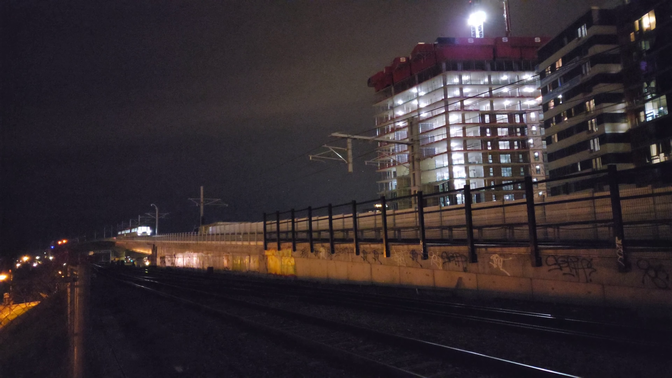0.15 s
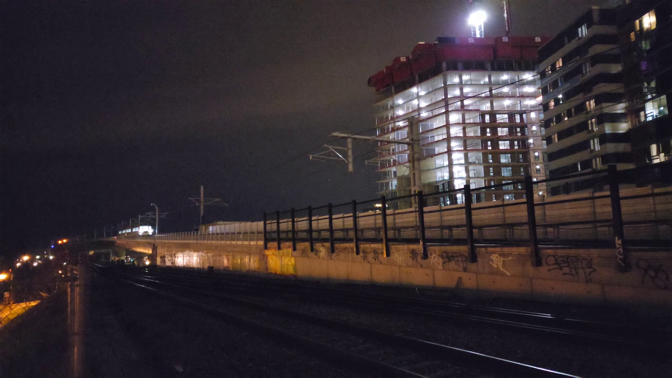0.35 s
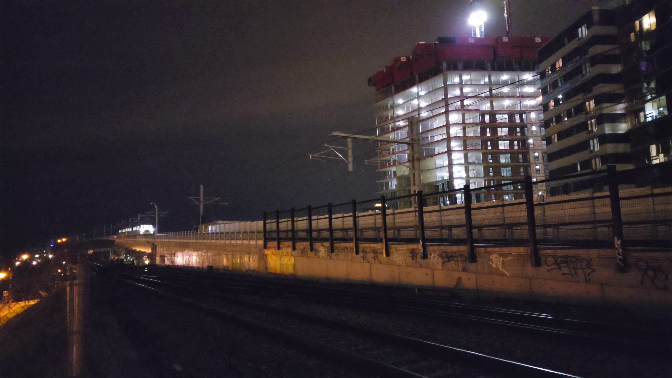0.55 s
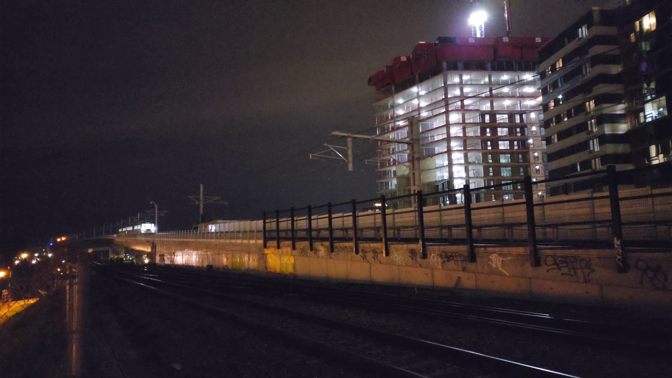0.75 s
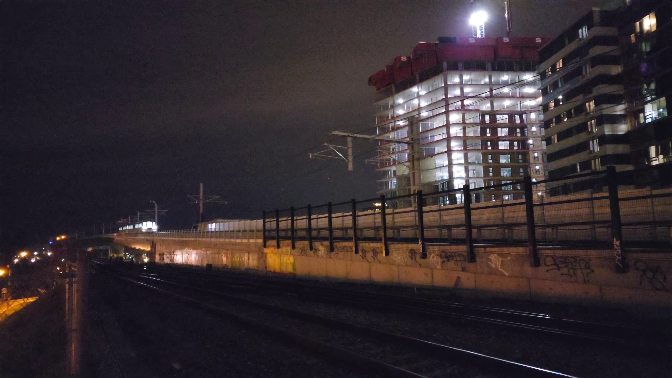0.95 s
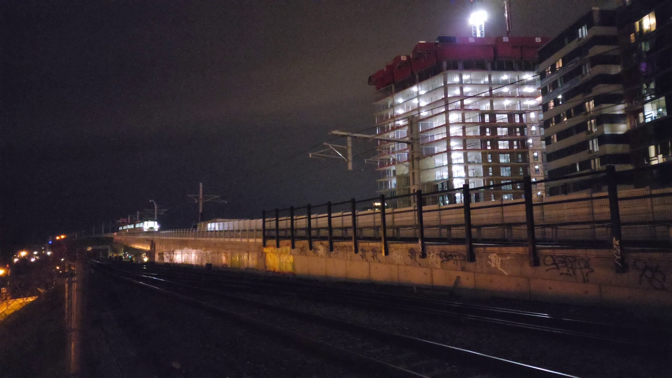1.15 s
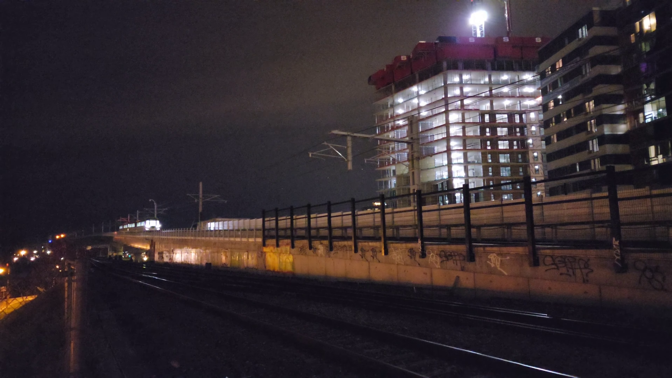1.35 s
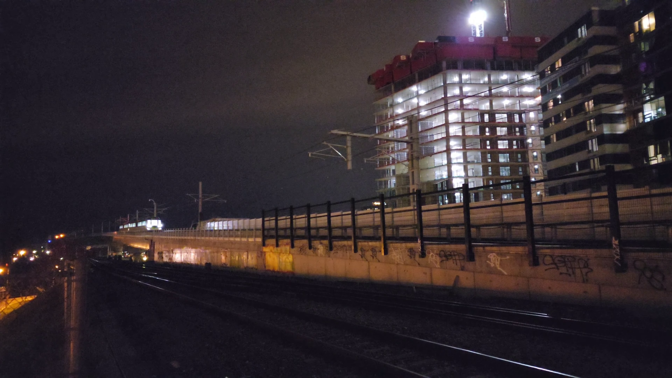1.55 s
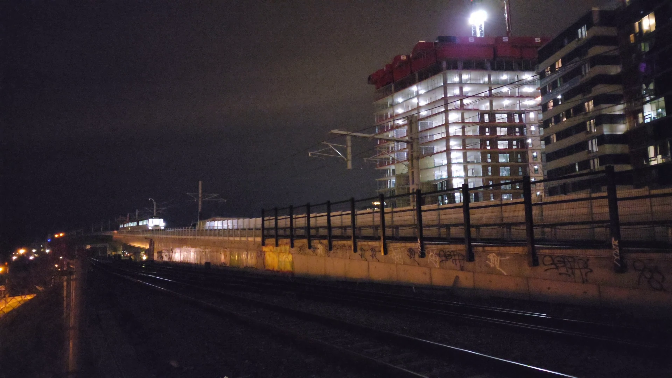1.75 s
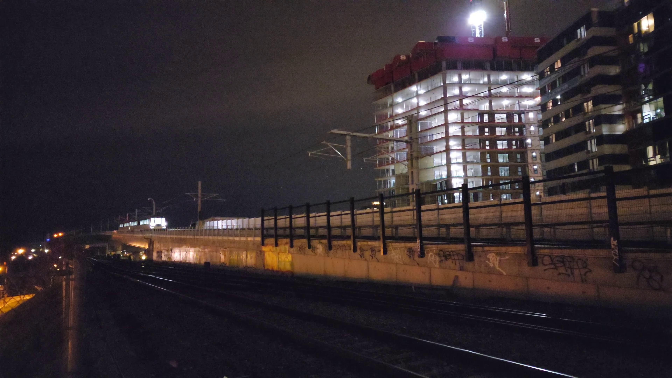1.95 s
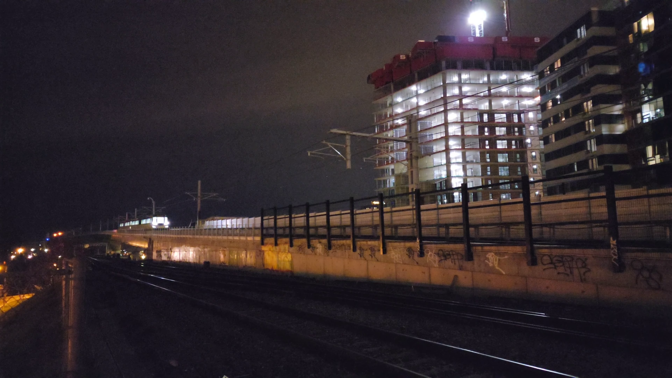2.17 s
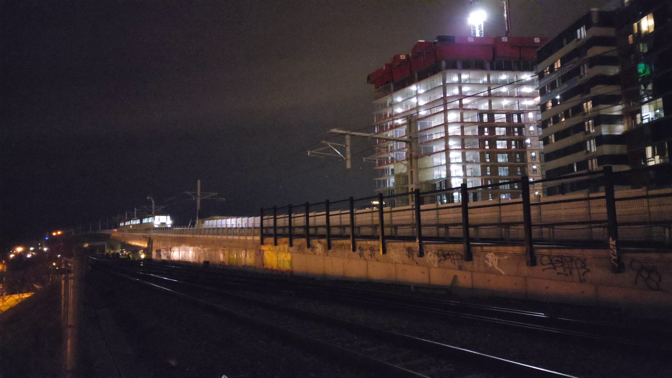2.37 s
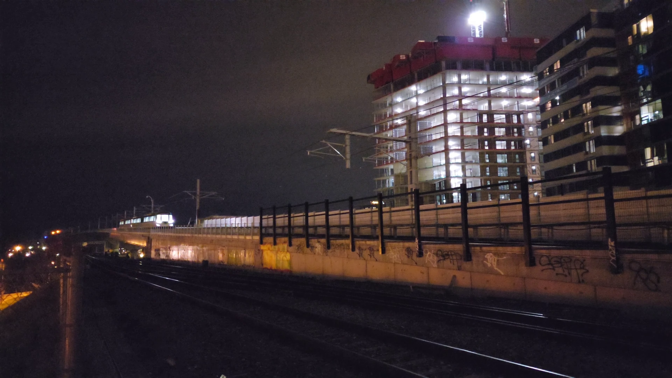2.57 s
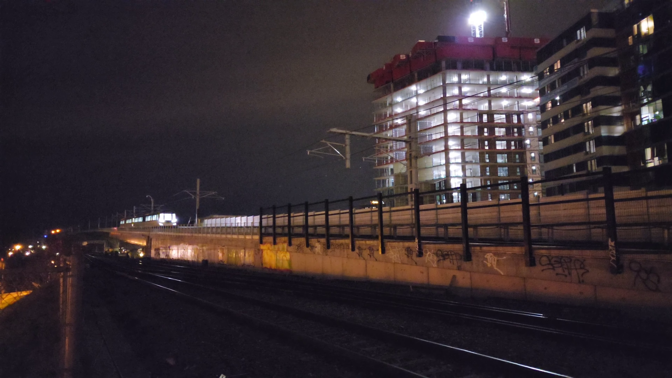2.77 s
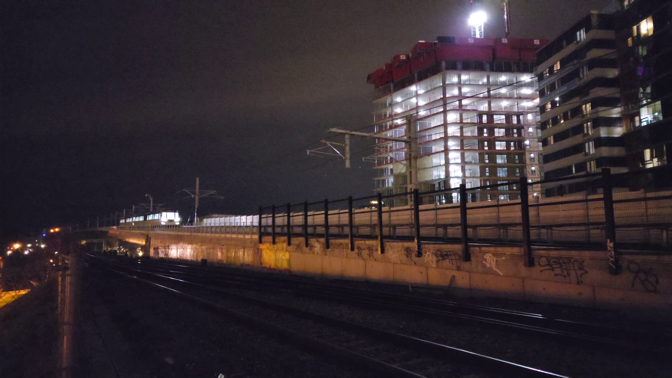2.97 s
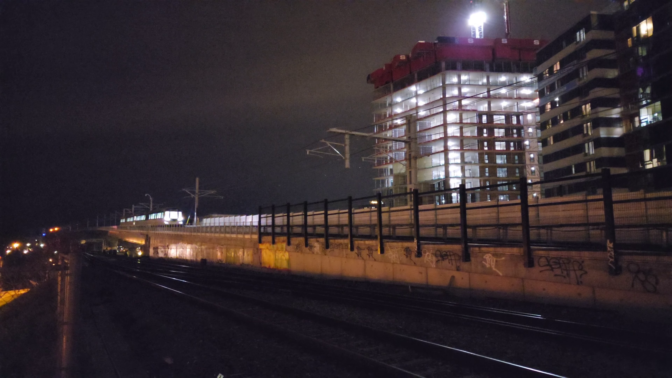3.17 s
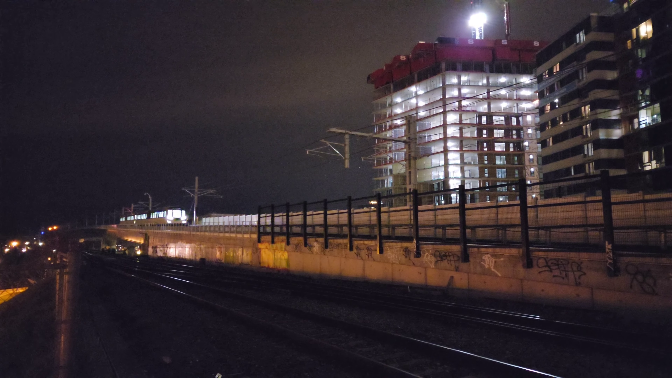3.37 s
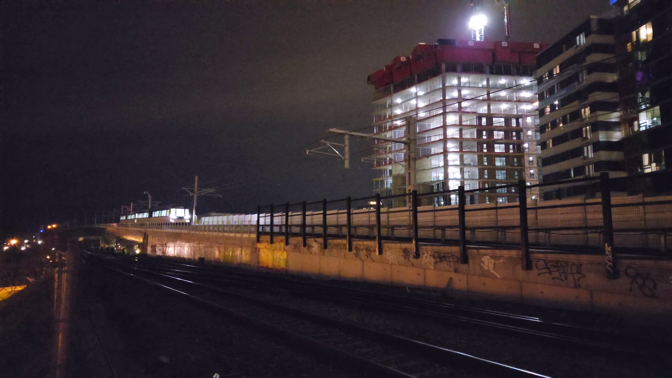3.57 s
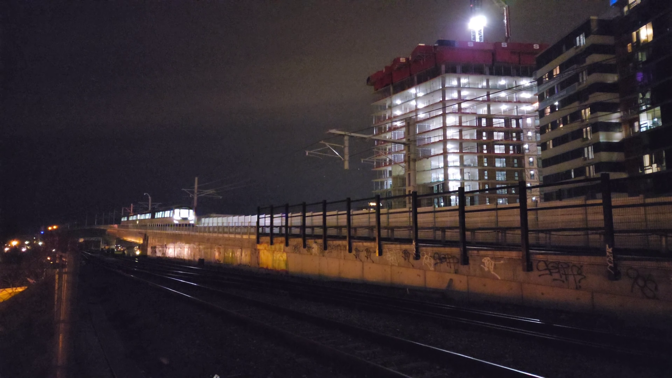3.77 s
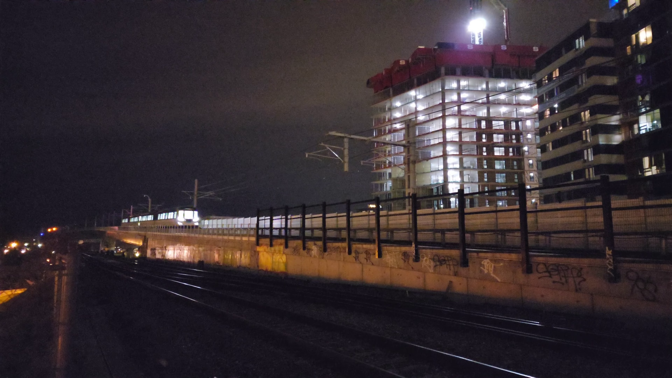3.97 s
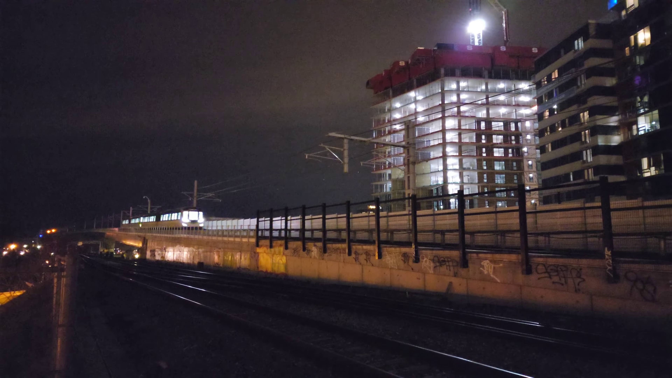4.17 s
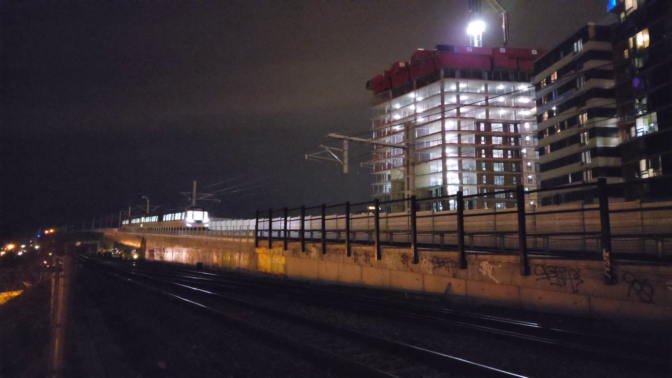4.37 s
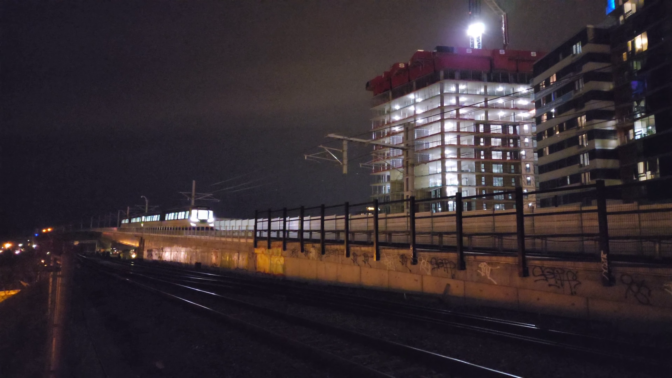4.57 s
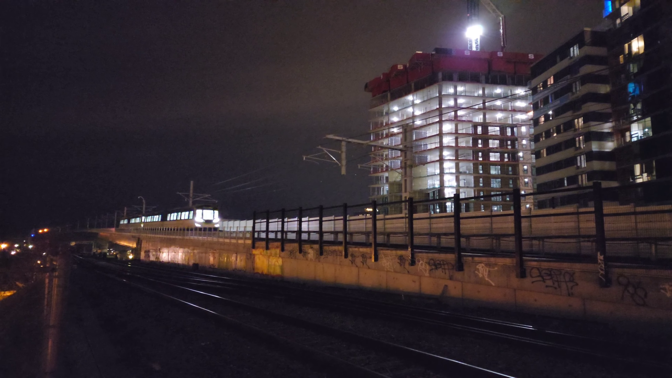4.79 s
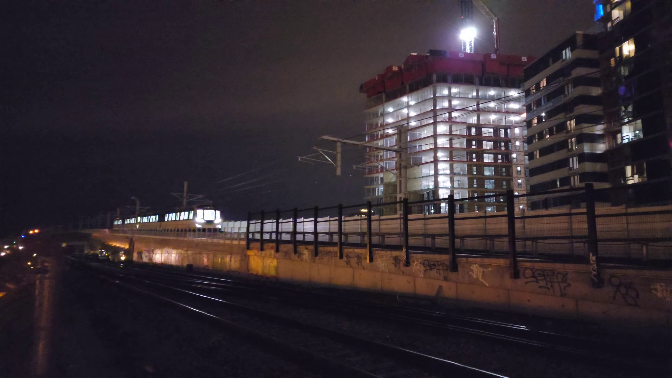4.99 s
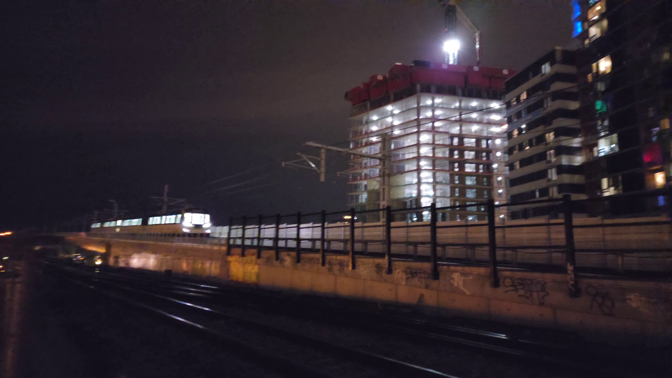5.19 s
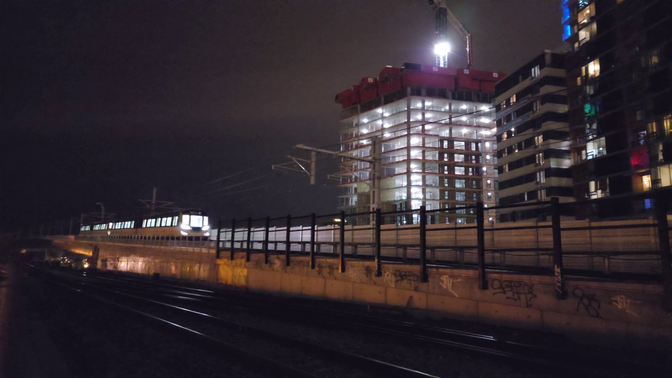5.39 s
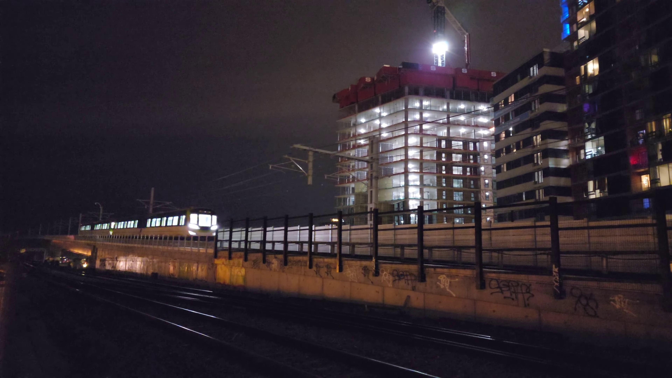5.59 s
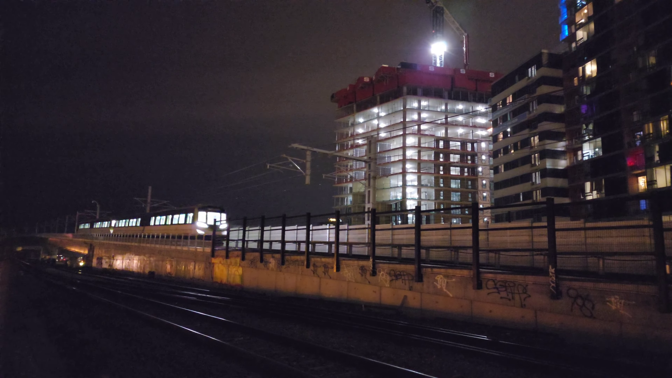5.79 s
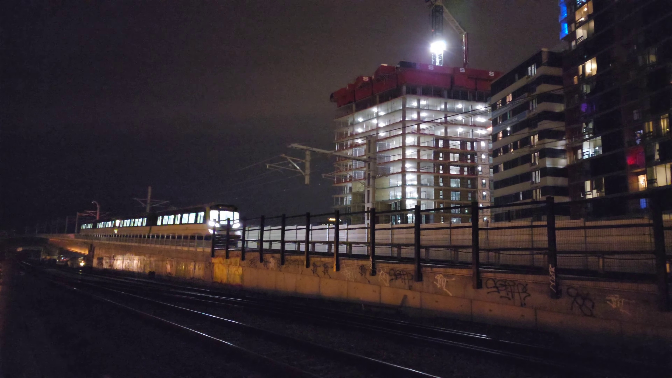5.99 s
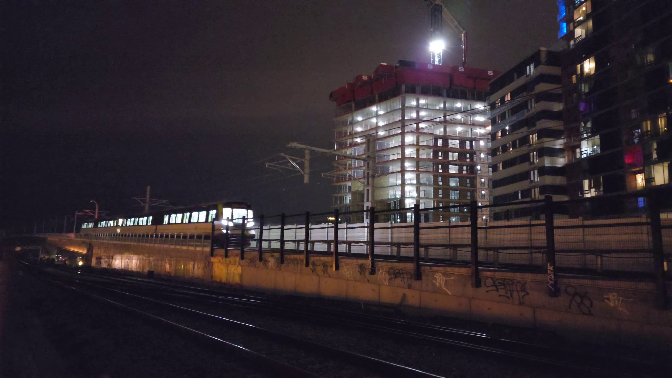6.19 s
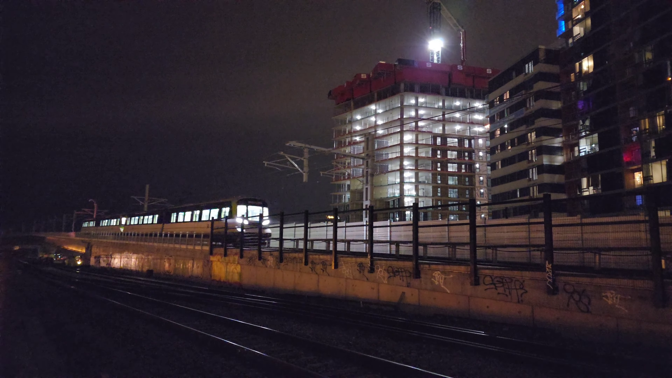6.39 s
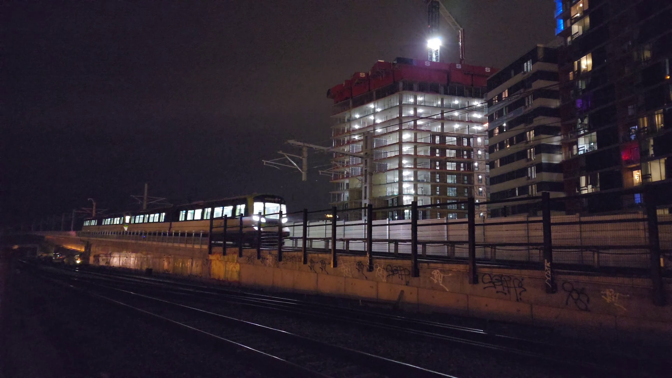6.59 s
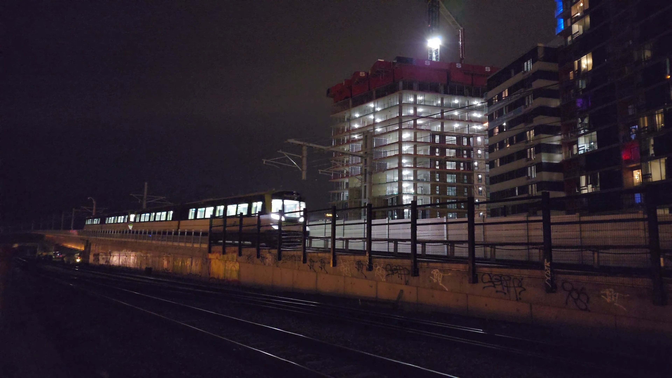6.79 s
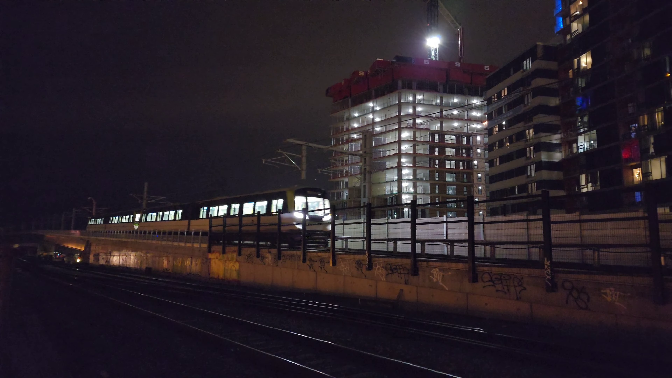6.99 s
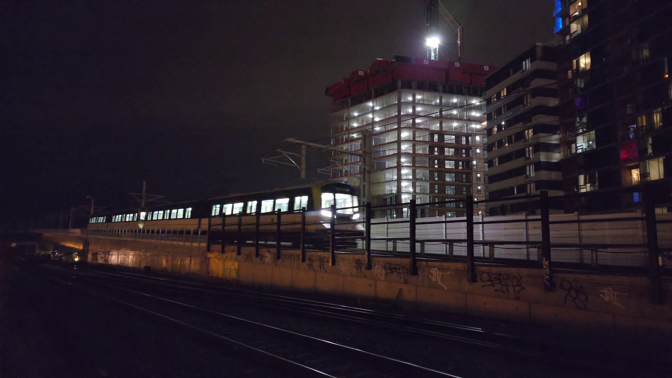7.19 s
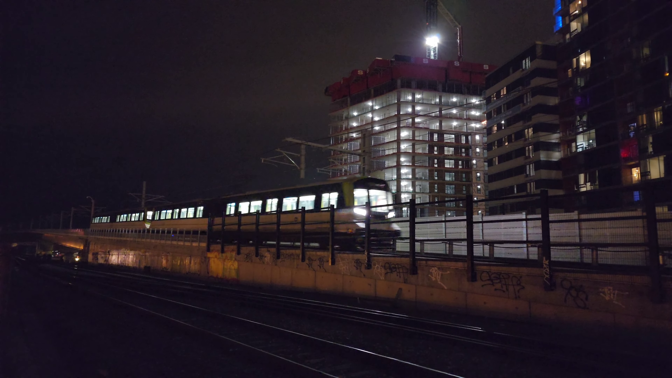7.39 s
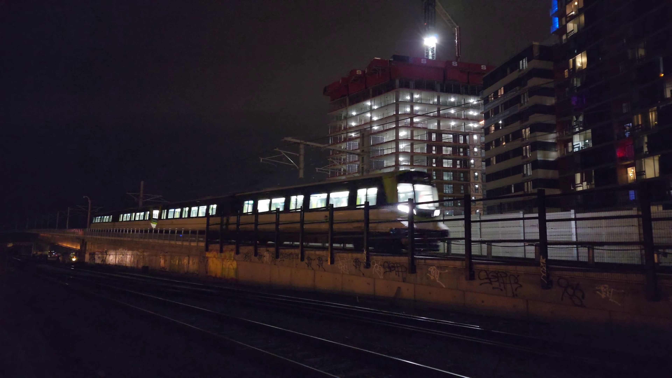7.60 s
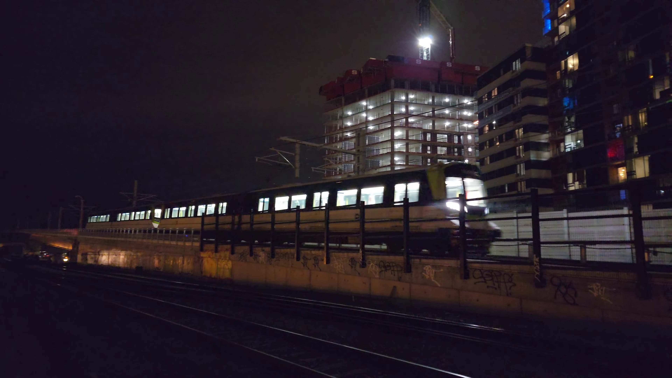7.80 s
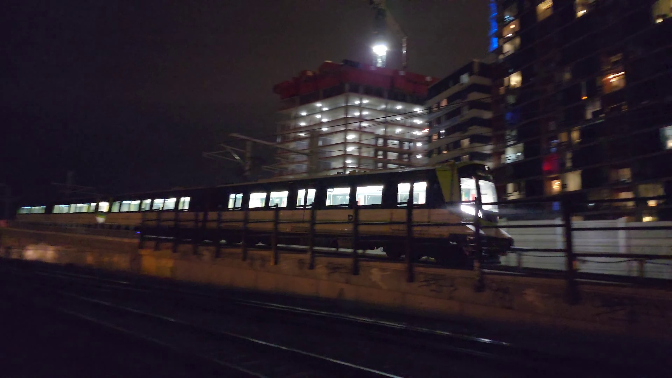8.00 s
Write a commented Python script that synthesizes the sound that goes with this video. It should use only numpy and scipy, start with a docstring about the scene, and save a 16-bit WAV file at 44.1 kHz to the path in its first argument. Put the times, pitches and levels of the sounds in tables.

```python
"""Metro train nearing on a viaduct

An electric metro train approaches on a concrete viaduct at night, over the low rumble of a city.
Rough wheels on rail drive two broad track resonances and a roar: filtered noises whose levels follow distance.
Wheels ring, rails sizzle and spans boom as sets of noise-driven modes; the traction whine is a sum of sines.
As the train nears, its hiss loses less to the air and the faint whine comes through.
"""
import sys
import numpy as np
from scipy import signal
from scipy.fft import rfft, irfft, next_fast_len
from scipy.io import wavfile
from scipy.ndimage import uniform_filter1d

SR = 44100
rng = np.random.default_rng(int(sys.argv[2]) if len(sys.argv) > 2 else 0)


def transcribe(signal):
    """Save signal, clipped to [-1, 1], as a 16-bit WAV file at the path in sys.argv[1]."""
    frames = np.atleast_2d(signal).T
    limited = np.clip(frames, -1, 1)
    pcm = np.round(limited * 32767).astype(np.int16)
    wavfile.write(sys.argv[1], SR, pcm)


N = 355005
TIME = np.arange(N) / SR  # s
SIZE = next_fast_len(N + SR // 10, True)  # transform length, with room for echoes
HZ = np.maximum(np.arange(SIZE // 2 + 1) * SR / SIZE, 1)

# the wheels come into the open round a bend: (time [s], time taken [s])
BEND = (2.48, .55)
# and then past a parapet: (time [s], time taken [s])
PARAPET = (4.54, .28)


def from_db(db):
    """Level to amplitude: 20 dB is a factor of ten."""
    return 10 ** (np.asarray(db) / 20)


def rms(x):
    """Effective value: the root of the mean power."""
    return np.sqrt(np.mean(x ** 2) + 1e-30)


def in_time(rows, blur_s=.01):
    """Linear interpolation of each column over time, its corners rounded by a moving mean."""
    s, *columns = np.transpose(rows)
    blur = max(int(blur_s * SR), 1)
    return [uniform_filter1d(np.interp(TIME, s, column), blur) for column in columns]


def in_frequency(rows):
    """Interpolation of each column on a logarithmic frequency axis."""
    hz, *columns = np.transpose(rows)
    return [np.interp(np.log(HZ), np.log(hz), column) for column in columns]


def colour(points):
    """Spectral envelope: gain through the points, falling 40 dB per octave beyond them."""
    octaves_outside = np.abs(np.log2(HZ / np.clip(HZ, points[0][0], points[-1][0])))
    return from_db(in_frequency(points)[0] - 40 * octaves_outside)


def resonances(modes, skirt=3.0):
    """Independently driven modes add in power; each skirt steepens some widths from its centre."""
    power = 0
    for hz, width_hz, db in modes:
        detune = (HZ ** 2 - hz ** 2) / (HZ * width_hz)
        peak = from_db(db) ** 2 / (1 + detune ** 2)
        power = power + peak / (1 + (detune / skirt) ** 2)
    return np.sqrt(power)


def drift(rate_hz):
    """Low-passed noise: slow chance of rms 1, changing about rate_hz times a second."""
    low_pass = 1 / (1 + (HZ / rate_hz) ** 4)
    slow = irfft(rfft(rng.standard_normal(SIZE)) * low_pass, SIZE)[:N]
    return slow / rms(slow)


def field(gain):
    """Partial coherence: coloured noise as two microphone ports hear it; their mean has rms 1."""
    # the ports: (frequency [Hz], in-phase likeness [1], quadrature likeness [1], left over right [dB])
    ports = [(90, 1, -.05, -.4), (210, .93, -.12, -.9), (330, .83, .15, -1.7), (437, .8, .12, 0),
             (590, .64, .25, -1.1), (730, -.26, .36, 1.1), (850, .55, .15, 0), (1080, -.42, .12, 1.5),
             (1220, -.25, -.12, 1), (1420, -.5, -.38, 0), (1700, -.15, -.42, -2.5), (1950, .76, .03, -1),
             (2300, .48, -.15, 0), (2800, -.28, -.2, 3.5), (4400, .049, .087, -3.5), (6800, 0, -.02, 1),
             (9500, .03, -.01, 1), (13000, .03, 0, 6.9)]
    in_phase, quadrature, balance_db = in_frequency(ports)
    alike = in_phase + 1j * quadrature
    alike = alike / np.maximum(1, np.abs(alike) / .998)  # coherence stays below 1
    shared, own = rfft(rng.standard_normal((2, SIZE)))
    lean = from_db(balance_db / 2)
    left = shared * lean
    right = (shared * np.conj(alike) + own * np.sqrt(1 - np.abs(alike) ** 2)) / lean
    # the colour holds for the sum of the ports
    centre = np.sqrt(lean ** 2 + lean ** -2 + 2 * alike.real)
    pair = irfft(np.array([left, right]) * gain / centre, SIZE)[:, :N]
    return pair / rms(pair.mean(axis=0))


def steady(pair, span_s):
    """Gain control by running power: evens slow swells of a narrow noise, keeps its fast beating."""
    power = uniform_filter1d(pair.mean(axis=0) ** 2, max(int(span_s * SR), 2))
    return pair / np.sqrt(power + 1e-9)


def hidden(step):
    """Smooth step: 1 while the wheels are screened, easing to 0 as they come into the open."""
    s, length_s = step
    return .5 - .5 * np.tanh(2 * (TIME - s) / length_s)


def swell(s, length_s):
    """Gaussian envelope: a smooth rise and fall of height 1, length_s wide at 1/e."""
    return np.exp(-(2 * (TIME - s) / length_s) ** 2)


def arriving(near_db, doubling_db=0, db_per_m=0, bend_db=0, parapet_db=0):
    """Spreading, absorption and screening: dB lost per doubling, per metre and behind each screen."""
    # uniform motion on a straight line, start_m short of the point abreast of the listener
    start_m, speed_m_per_s, aside_m = 189.9, 20.01, 15.1
    metres = np.hypot(start_m - speed_m_per_s * TIME, aside_m)
    nearest_m = metres.min()
    spreading_db = doubling_db * np.log2(metres / nearest_m)
    absorbed_db = db_per_m * (metres - nearest_m)
    screened_db = bend_db * hidden(BEND) + parapet_db * hidden(PARAPET)
    return near_db - spreading_db - absorbed_db - screened_db


def surges():
    """Amplitude modulation: level changes [dB] of lower resonance, upper resonance and roar."""
    # brief swells of the rolling noise: (time [s], length [s], lower resonance [dB],
    # upper resonance [dB], roar [dB])
    rolling_swells = [(.37, .13, 2, 0, 0), (.63, .12, 2.5, -1, 0), (.92, .15, 3, 1, 0),
                      (1.26, .14, 2.5, 0, -.5), (1.56, .14, 1.5, 3.5, 1), (2.16, .13, 4, 2, 0),
                      (2.55, .33, 1, 1, 4), (2.69, .12, 0, 3, 1), (2.81, .16, 5.5, 1.5, 1),
                      (3.0, .16, 3.5, 2, .5), (3.39, .1, 0, 2, 1.8), (3.53, .18, 4, 1.5, .5),
                      (3.76, .16, 4, 5, .5), (4.15, .14, .5, 2.5, 0), (4.45, .6, 4.8, -1, -.5),
                      (4.69, .13, 1.5, 5, 1), (4.94, .2, 3.5, 3.2, 1.5), (5.14, .14, 4, 1.5, 0),
                      (5.29, .14, 2, 3.5, 1), (5.55, .28, 2.2, 3, 1.3), (6.13, .25, 1.5, 2.5, .5),
                      (6.43, .14, 2.5, 1.5, 1.8), (6.61, .13, 5, 1.5, 1.5), (6.87, .25, 0, 3, 1.5),
                      (7.42, .2, .5, .7, 1.2), (7.68, .28, 6.5, 1.8, .5), (7.93, .1, 3, -3, 1),
                      (8.03, .1, 1, 4, 0)]
    return sum(np.outer(db, swell(s, length_s)) for s, length_s, *db in rolling_swells)


def bumps():
    """Amplitude modulation: a constant judder, and a quick, rounded lift [dB] at each listed time."""
    # brief lifts of the rolling noise: (time [s], lift [dB])
    brief_lifts = [(1.747, 3.5), (2.377, 2.5), (3.15, 3), (4.14, 3), (4.67, 2.5), (4.998, 2.5),
                   (5.276, 2.5), (5.683, 3.5), (6.451, 2.5), (6.882, 3.5), (7.084, 2.5)]
    rise_s, hold_s, fall_s = .004, .016, .02
    level_db = .45 * drift(35)
    for s, db in brief_lifts:
        rise = 1 - hidden((s, rise_s))
        fall = hidden((s + hold_s, fall_s))
        level_db = level_db + db * rise * fall
    return level_db


def flares():
    """Amplitude modulation: level changes [dB] of the wheels' wash, the hiss and the rail hiss."""
    # moments when wheels and rails grow louder or softer: (time [s], length [s], wheel wash [dB],
    # hiss [dB], rail hiss [dB])
    moments = [(2.68, .5, 2, 2.5, .5), (3.6, .45, 2, .7, 1), (4.4, .35, -1.5, 2.2, -.8),
               (4.74, .2, .7, 1.1, .7), (5.25, 1.1, -1.6, -1.9, -.3), (6.02, .14, 2.3, 1, .5),
               (6.5, .5, .5, .8, .5), (7.25, .25, 2.2, .3, .5), (8.02, .3, 1.5, .5, 1.5)]
    return sum(np.outer(db, swell(s, length_s)) for s, length_s, *db in moments)


def wandering(pair, share, rate_hz):
    """Time warping: a wavering reading speed makes pitch stray by an rms share of itself."""
    place = np.arange(N) + np.cumsum(share * drift(rate_hz))
    longer = np.pad(pair, ((0, 0), (0, SR // 10)), mode="reflect")
    samples = np.arange(longer.shape[1])
    return np.array([np.interp(np.abs(place), samples, port) for port in longer])


def track():
    """Forced resonance: wheel and rail shake the rails on their fastenings at two straying pitches."""
    # lower resonance of rails on fastenings: (frequency [Hz], width [Hz], level [dB])
    lower_modes = [(431, 35, 1.2), (468, 30, 1.1)]
    # upper resonance of rails on fastenings: (frequency [Hz], width [Hz], level [dB])
    upper_modes = [(676, 42, -1), (706, 31, 3), (730, 24, -4.2), (798, 45, -13)]
    stray, strays_per_s = .014, 3.5  # stray is an rms share of the pitch
    lower_surge_db, upper_surge_db, _ = surges()
    lower_db = arriving(near_db=-27.9, doubling_db=4.0) + lower_surge_db
    upper_db = arriving(near_db=-24.3, doubling_db=6.2) + upper_surge_db
    lower = wandering(field(resonances(lower_modes, skirt=3.7)), stray, strays_per_s)
    upper = wandering(field(resonances(upper_modes, skirt=4.0)), stray, strays_per_s)
    return from_db(lower_db) * steady(lower, span_s=.18) + from_db(upper_db) * steady(upper, span_s=.18)


def roar():
    """Broadband contact noise: the contact patches roar, louder or softer in brief swells."""
    # spectrum of the contact patches: (frequency [Hz], density [dB per Hz])
    spectrum = [(250, -23), (400, 0.5), (530, 8.5), (620, 9.3), (760, 8.5), (850, 7), (900, 3),
                (1050, -0.4), (1170, -4.5), (1300, -3.5), (1480, -6.5), (1650, -11.5), (2400, -27.5)]
    *_, surge_db = surges()
    level_db = arriving(near_db=-21.5, doubling_db=7.0) + surge_db + 0.66 * drift(22)
    return from_db(level_db) * field(colour(spectrum))


def deck():
    """Structure-borne sound: the deck drones as a band of low noise."""
    # spectrum of the deck: (frequency [Hz], density [dB per Hz])
    spectrum = [(120, -25), (175, -9), (240, -1.4), (320, 2), (390, 1), (480, -3.5), (700, -24)]
    return from_db(arriving(near_db=-31.3, doubling_db=4.0)) * field(colour(spectrum))


def wheels(flare_db):
    """Modal superposition: many wheels ring at nearly the same modes, within a broader wash."""
    # ringing of the wheels: (frequency [Hz], width [Hz], level [dB])
    modes = [(1255, 70, -4), (1337, 10, 3.2), (1392, 26, -2), (1455, 44, -2), (1548, 22, -3),
             (1648, 22, -.5), (1718, 40, 1), (1825, 50, -1.5), (1895, 24, -3), (1977, 28, 2.2),
             (2172, 30, -4.5), (2235, 30, -1), (2300, 60, -6.5), (2540, 50, -16), (2903, 50, -22),
             (3108, 13, -22), (3336, 28, -19.5)]
    # spectrum of the wash around it: (frequency [Hz], density [dB per Hz])
    wash_spectrum = [(1100, -29.5), (1500, -13.5), (1750, 2.5), (1930, 4), (2100, 1), (2310, -0.3),
                     (2420, -6.5), (2700, -15.5), (3300, -36)]
    ring_db = arriving(near_db=-35.3, db_per_m=0.087, parapet_db=4.5) + .8 * drift(6)
    wash_db = arriving(near_db=-35, db_per_m=.108, parapet_db=3.1) + flare_db + .6 * drift(9)
    ring = from_db(ring_db) * field(resonances(modes, skirt=5.5))
    return ring + from_db(wash_db) * field(colour(wash_spectrum))


def hiss(flare_db):
    """Air absorption: three bands of hiss gain level as the path shortens and the screens pass."""
    # spectrum of the main hiss: (frequency [Hz], density [dB per Hz])
    main_spectrum = [(1900, -15), (2500, -.4), (2800, -1), (2950, 0), (3120, -1.8), (3420, 1.4),
                     (3640, -1.9), (3780, -1), (4020, -13.5), (4600, -29), (6000, -42)]
    # spectrum of the finer hiss above it: (frequency [Hz], density [dB per Hz])
    fine_spectrum = [(5500, -3.5), (7200, 4.5), (8000, 3), (8700, 1.5), (9400, -4.5), (10300, -8),
                     (11200, -16.5), (13000, -29.5)]
    # spectrum of the topmost rush: (frequency [Hz], density [dB per Hz])
    rush_spectrum = [(5000, -11), (8000, -3), (10300, -2), (11200, -1.5), (12500, 1.5), (15700, 0),
                     (18000, -6)]
    main_db = arriving(near_db=-43.5, doubling_db=9.5, db_per_m=0.029) + flare_db + .4 * drift(8)
    fine_db = arriving(near_db=-57.5, doubling_db=5, db_per_m=.15, bend_db=14) + .5 * drift(5)
    rush_db = arriving(near_db=-58, doubling_db=16.5, bend_db=5.5)
    main = from_db(main_db) * field(colour(main_spectrum))
    fine = from_db(fine_db) * field(colour(fine_spectrum))
    return main + fine + from_db(rush_db) * field(colour(rush_spectrum))


def rails(flare_db):
    """Rail radiation: the rails hiss, sizzle in high modes and sing for a while at single modes."""
    # spectrum of the rail hiss: (frequency [Hz], density [dB per Hz])
    hiss_spectrum = [(3500, -11.5), (3800, 1.5), (4200, .5), (4450, 0), (4760, .5), (5000, -3),
                     (5600, -5.5), (5900, -7.5), (6200, -7.5), (6800, -17.5), (8000, -24.5)]
    # sizzling of the rails: (frequency [Hz], width [Hz], level [dB])
    sizzle_modes = [(4830, 210, 2), (5250, 300, -1.5), (5650, 300, -1), (6270, 230, 4), (6710, 115, 4.6),
                    (7090, 90, -5), (8410, 120, -7)]
    # singing modes: (time [s], length [s], frequency [Hz], width [Hz], level [dB])
    singing_modes = [(2.1, 1.6, 4830, 280, -84.5), (3.5, 2.4, 6330, 300, -81), (3.9, 2.4, 6760, 170, -78.5)]
    hiss_db = arriving(near_db=-50, db_per_m=0.2, bend_db=0.5, parapet_db=6) + flare_db
    sizzle_db = arriving(near_db=-59.5, db_per_m=.175, bend_db=13.5) + .6 * drift(7)
    out = from_db(hiss_db) * field(colour(hiss_spectrum))
    out = out + from_db(sizzle_db) * field(resonances(sizzle_modes, skirt=3.0))
    for s, length_s, hz, width_hz, db in singing_modes:
        level = from_db(db + 1.5 * drift(10)) * swell(s, length_s)
        out = out + level * field(resonances([(hz, width_hz, 0)]))
    return out


def squeal():
    """Narrow-band resonance: a faint high squeal of a wheel grows as it nears."""
    # the squealing mode: (frequency [Hz], width [Hz], level [dB])
    modes = [(10375, 90, 0)]
    return from_db(arriving(near_db=-71.0, doubling_db=26)) * field(resonances(modes, skirt=3.0))


def whine():
    """Harmonic synthesis: inverter overtones; changing reflections make each swell and fade per port."""
    # overtones: (multiple of the switching tone [1], relative level [dB])
    overtones = [(8, -16), (9, -24), (10, -16), (12, -25), (16, -24.5), (17, -25)]
    tone_hz, waver, flutter_db = 467.8, .0007, 3.5  # waver is an rms share of the pitch
    turns = np.cumsum(tone_hz * (1 + waver * drift(5.6))) / SR
    out = np.zeros((2, N))
    for multiple, db in overtones:
        for port in out:
            phase = multiple * turns + rng.random() + .15 * drift(4)  # in cycles
            port += from_db(db + flutter_db * drift(5.5)) * np.sin(2 * np.pi * phase)
    return out * from_db(arriving(near_db=-44.5, db_per_m=0.3, bend_db=8, parapet_db=5))


def facades(pair, count=10):
    """Comb filtering: short echoes off parapet and buildings ripple the colour above the bass."""
    delays_s = rng.uniform(.004, .035, (2, count, 1))
    share = .2 * HZ ** 2 / (HZ ** 2 + 900 ** 2)
    echoes = np.exp(-2j * np.pi * HZ * delays_s).sum(axis=1) / np.sqrt(count)
    response = (1 + share * echoes) / np.sqrt(1 + share ** 2)
    return irfft(rfft(pair, SIZE) * response, SIZE)[:, :N]


def focus(pair):
    """Mid-side stereo: wide by reflections, narrowing as the direct sound takes over."""
    # stereo width: (time [s], gain of the side signal before the band weights [dB])
    width = [(0, -0.3), (1.5, 1), (3.8, 2), (5.2, -0.1), (6.3, -.5), (7.1, -3.5), (7.8, -7)]
    # band weights: (frequency [Hz], share that changes [dB])
    band = [(200, -20.5), (450, -9.5), (700, -0.5), (1100, -1.5), (2000, -10.5), (4000, -24)]
    width_db, = in_time(width)
    side = (pair[0] - pair[1]) / 2
    side_band = irfft(rfft(side, SIZE) * from_db(in_frequency(band)[0]), SIZE)[:N]
    return pair + side_band * (from_db(width_db) - 1) * [[1], [-1]]


def spans():
    """Bending modes: the concrete spans boom under the train, and the nearest one drones."""
    # boom of the spans: (frequency [Hz], width [Hz], level [dB])
    boom_modes = [(52, 16, 0), (66, 20, -1)]
    # brief swells of the boom: (time [s], lift [dB])
    boom_swells = [(2.02, 5), (3.34, 5.5), (4.55, 7.5)]
    # drone of the nearest span: (frequency [Hz], width [Hz], level [dB])
    drone_modes = [(61, 5, -4), (73, 5, -0.5), (84, 6, -5)]
    boom_db = arriving(near_db=-41.5, doubling_db=2.5)
    boom_db = boom_db + sum(db * swell(s, length_s=.14) for s, db in boom_swells)
    drone_db = arriving(near_db=-39.0, doubling_db=3, parapet_db=5.5)
    boom = from_db(boom_db) * steady(field(resonances(boom_modes, skirt=2.9)), span_s=.3)
    return boom + from_db(drone_db) * steady(field(resonances(drone_modes, skirt=3.0)), span_s=.3)


def tick():
    """Impulse response: one faint, dry tick near the microphone, a click through damped resonators."""
    # the click: (time [s], level before the resonators [dB])
    clicks_at = [(2.295, -62.5)]
    # its modes: (frequency [Hz], width [Hz], level [dB])
    modes = [(4100, 400, 4), (6250, 400, 0), (8000, 300, 1)]
    clicks, out = np.full(N, 1e-18), 0
    for s, db in clicks_at:
        clicks[int(s * SR)] = from_db(db)
    for hz, width_hz, db in modes:
        radius, angle = np.exp(-np.pi * width_hz / SR), 2 * np.pi * hz / SR
        poles = [1, -2 * radius * np.cos(angle), radius * radius]
        out = out + signal.lfilter([0, from_db(db) * np.sin(angle)], poles, clicks)
    return signal.sosfilt(signal.butter(4, 8500, fs=SR, output="sos"), out)  # dulled above 8500 Hz


def city():
    """Diffuse background: an even low rumble of noise, and a low hum that wavers slowly."""
    # spectrum of the city: (frequency [Hz], density [dB per Hz])
    spectrum = [(15, -16), (30, -13.5), (48, -1.5), (76, -4.5), (103, 2.5), (118, 0), (138, -5.5),
                (175, -4), (230, -11), (320, -22.5)]
    rumble_db, hum_db, hum_waver_db, hum_hz = -41, -50, 2.5, 59.2
    hum_level = from_db(hum_db + hum_waver_db * drift(1.5))
    hum = np.sqrt(2) * np.sin(2 * np.pi * hum_hz * TIME + .4 * drift(1.5))
    return hum_level * hum + from_db(rumble_db) * steady(field(colour(spectrum)), span_s=0.32)


def scene():
    """Superposition: the train, its echoes and its spans over the city's rumble."""
    jolt = from_db(bumps())
    wash_flare_db, hiss_flare_db, rail_flare_db = flares()
    rolling = roar() + deck() + wheels(wash_flare_db)
    high = hiss(hiss_flare_db) + rails(rail_flare_db) + squeal() + whine()
    train = focus(jolt * track() + facades(jolt * rolling + high))
    return train + spans() + tick() + city()


def record(dry):
    """Noise floor and band limit: the microphones add a trace of noise; a low-pass cuts the top."""
    noise_db, cutoff_hz = -106, 15750
    noisy = dry + from_db(noise_db) * rng.standard_normal((2, N))
    return signal.sosfilt(signal.ellip(12, .1, 80, cutoff_hz, fs=SR, output="sos"), noisy)


dry = scene()
out = record(dry)
transcribe(out)
```